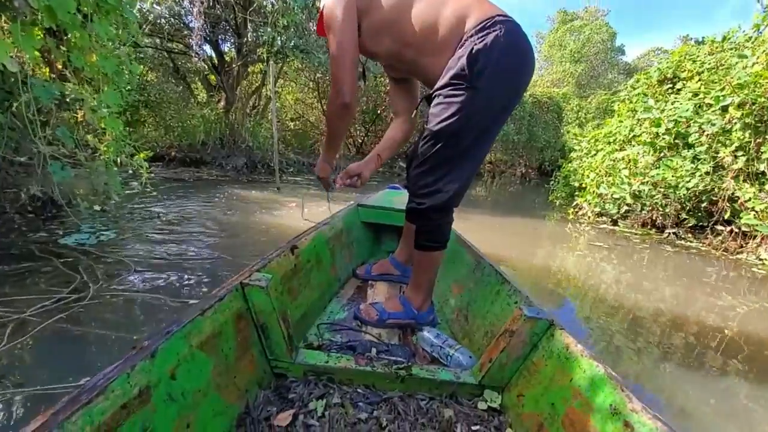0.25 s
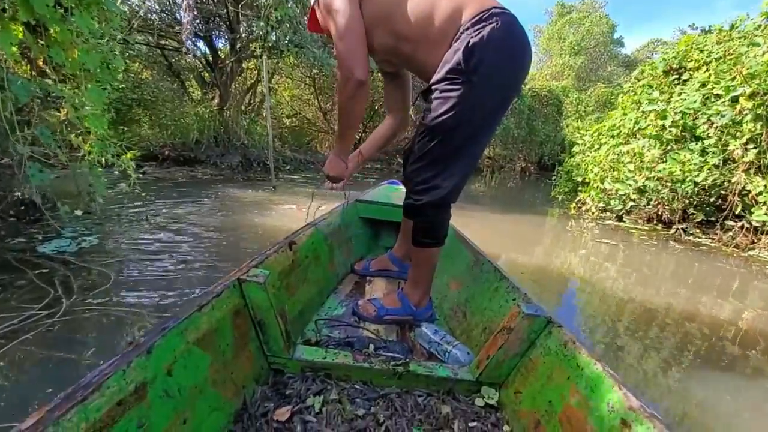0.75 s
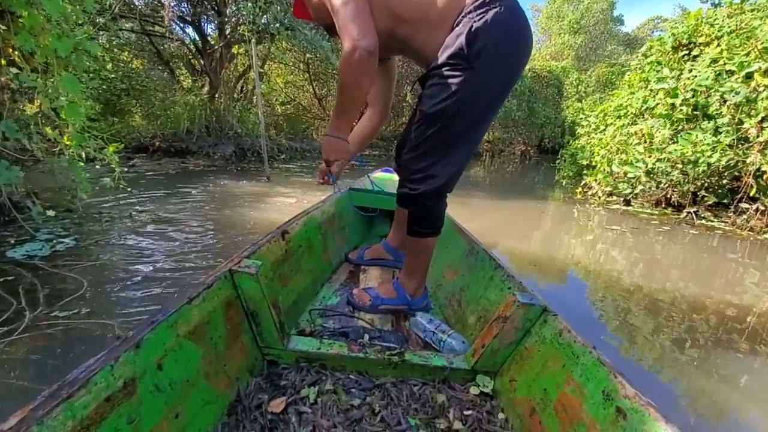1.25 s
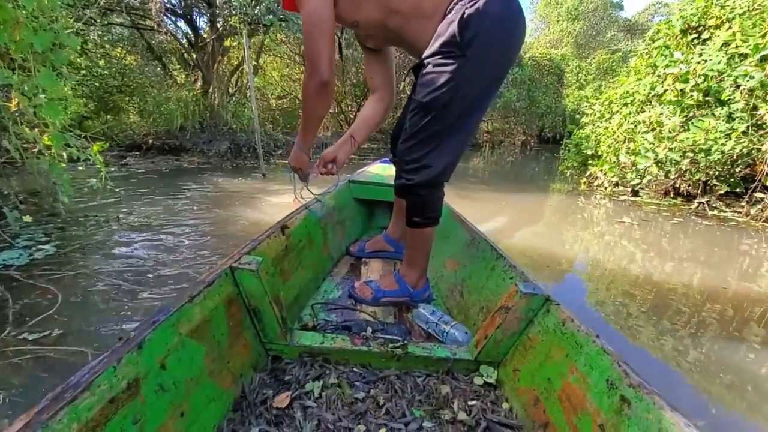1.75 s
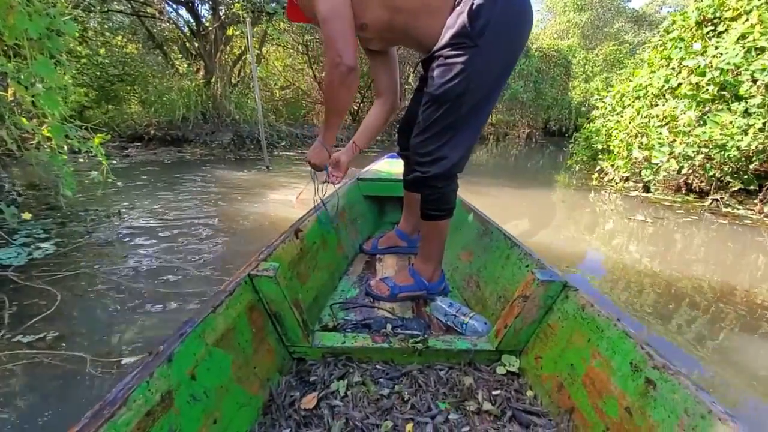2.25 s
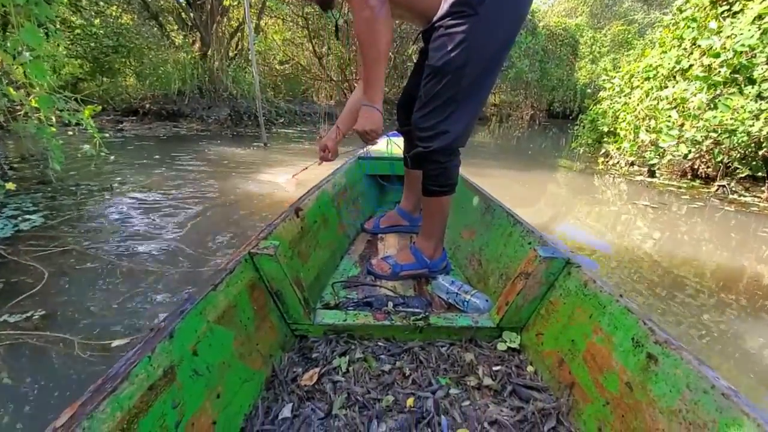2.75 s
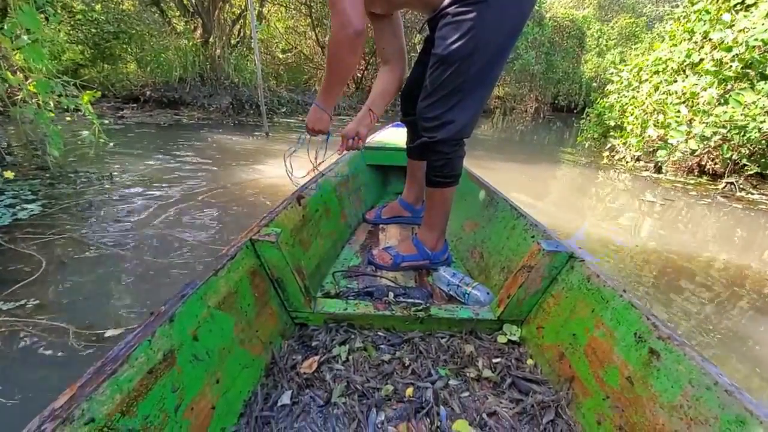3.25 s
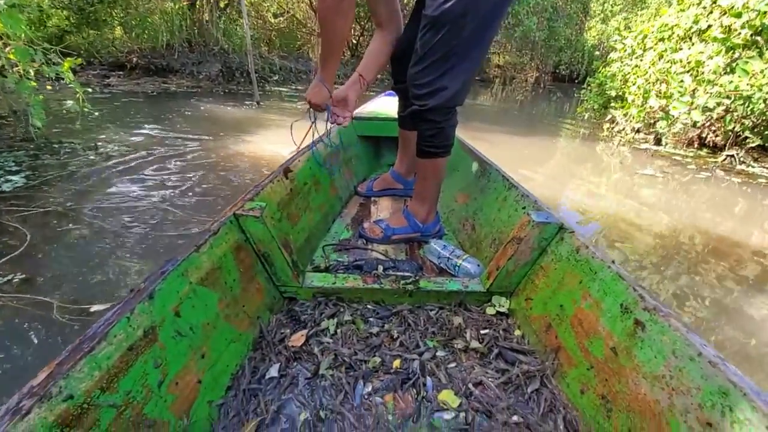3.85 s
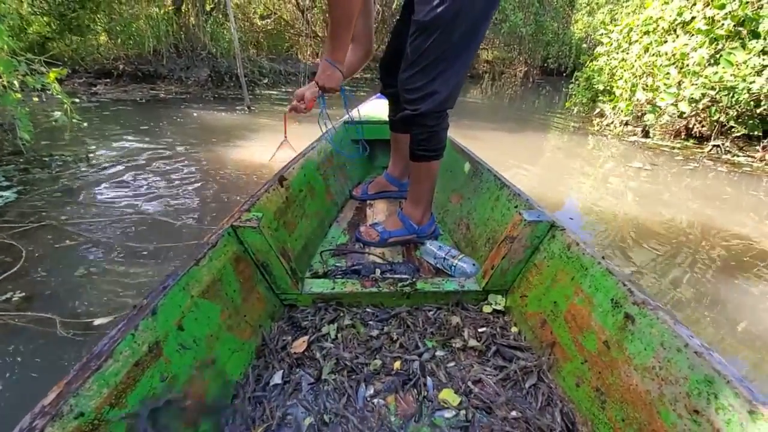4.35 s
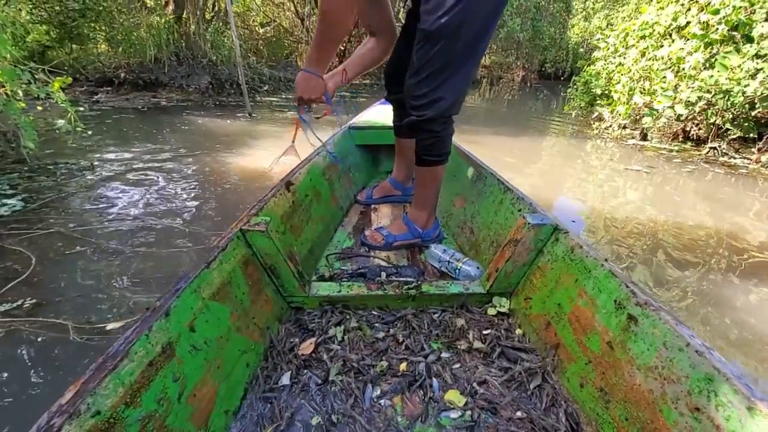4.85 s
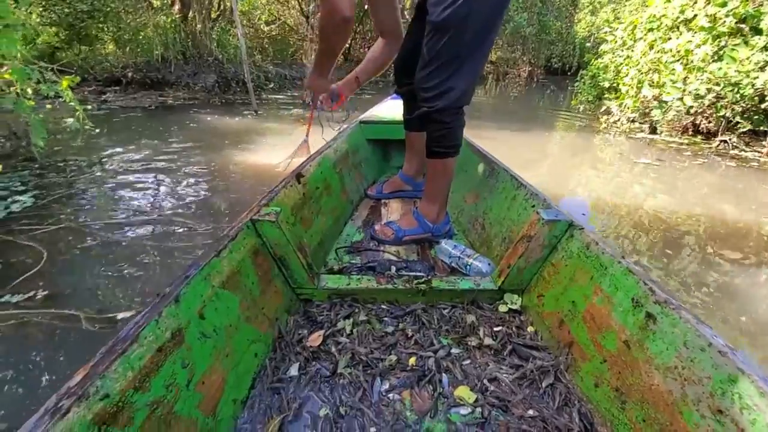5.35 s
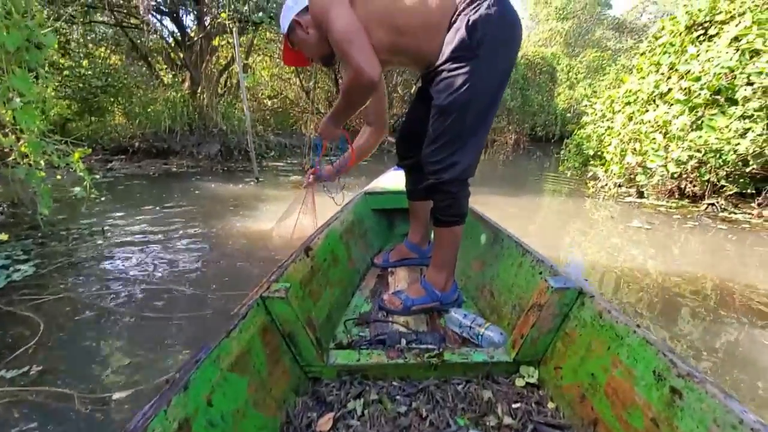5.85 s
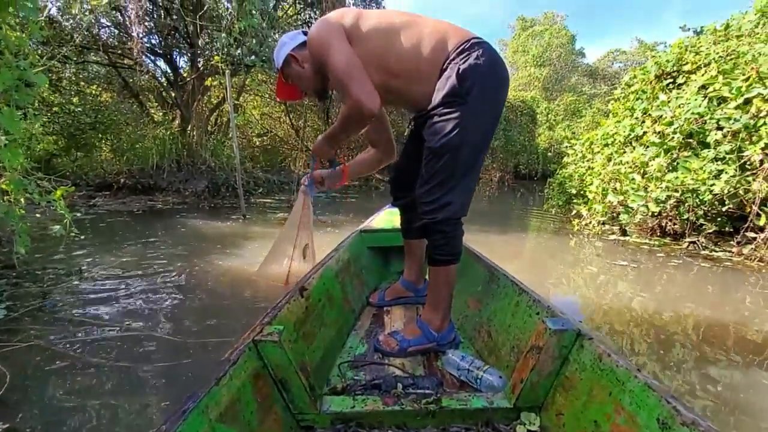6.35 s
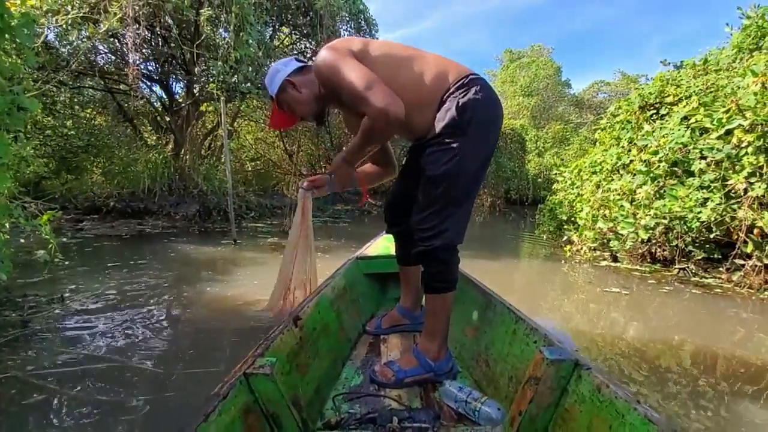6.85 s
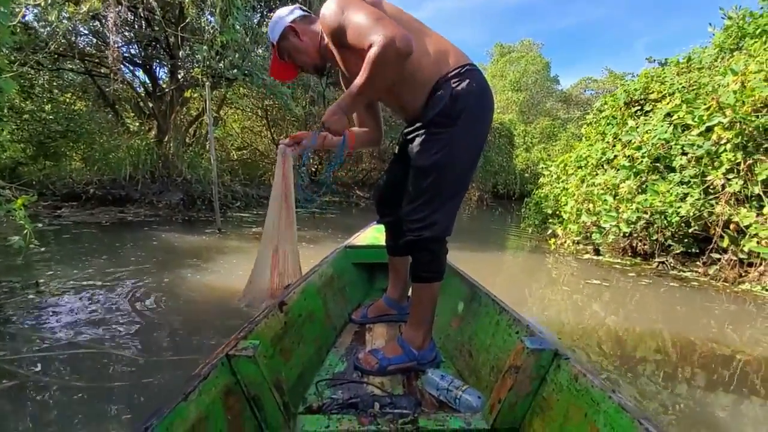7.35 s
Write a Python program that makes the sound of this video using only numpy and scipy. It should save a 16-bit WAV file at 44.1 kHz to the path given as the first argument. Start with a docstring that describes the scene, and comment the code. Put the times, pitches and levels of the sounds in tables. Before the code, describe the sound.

Close stereo outdoors on a small wooden boat: a wet line drags over the edge in four short bursts of croaking, rasping friction, the planks ringing dully. Between pulls come hull knocks, bright drips, plops and brief gushes running off a net. Soft ripples thump underneath. Behind lie faint insects, leaves, light wind and a distant low motor that swells near the end.

```python
"""Hauling a cast net into a wooden boat

A cast net is hauled hand over hand to the bow of a small wooden boat, in a quiet channel.
Four pulls drag the wet line over the gunwale: stick-slip rings the planks, snapping fibres make rasping noise.
Water runs off as grainy noise and drips as bubbles that rise in pitch; the hull rings when knocked.
Behind lie ripples under the hull, swept-sine birds, noise bands for insects, leaves and wind, and a far
motor of three partials."""
import sys
import numpy as np
from scipy import signal
from scipy.fft import rfft, irfft, next_fast_len
from scipy.io import wavfile
from scipy.ndimage import uniform_filter1d, map_coordinates

SR = 44100
rng = np.random.default_rng(int(sys.argv[2]) if len(sys.argv) > 2 else 0)


def generate_wav(sig):
    """Save sig (samples, or channels by samples) to the path in sys.argv[1] as 16-bit PCM at SR."""
    pcm = np.round(np.clip(np.atleast_2d(sig).T, -1, 1) * 32767).astype(np.int16)
    wavfile.write(sys.argv[1], SR, pcm)


N = 335139
TIME = np.arange(N) / SR  # s
LET_GO_S = 0.11  # a released tug falls 60 dB in this time, besides its sag

# each pull is two tugs, one for each hand; the line tightens, then slides:
# (time [s], tightening [s], sliding [s], croak level [dB], rasp level [dB], hiss level [dB],
#  tight pitch [Hz], sliding pitch [Hz])
LINE_TUGS = [(0.098, 0.096, 0.051, -19.5, -27.5, -39.5, 520, 540),
             (0.292, 0.083, 0.12, -17, -24.5, -36.5, 487, 541),
             (2.808, 0.018, 0.035, -29.5, -28, -48.5, 520, 560),
             (2.882, 0.1, 0.043, -33, -40.5, -52.5, 486, 508),
             (3.453, 0.11, 0.16, -20, -29.5, -35.5, 468.5, 465),
             (3.732, 0.11, 0.24, -21.5, -24, -36.5, 465, 788),
             (5.564, 0.064, 0.027, -22.5, -28.5, -41.5, 480, 510),
             (5.688, 0.062, 0.2, -17, -22.5, -42.5, 501, 633)]
# the hardest catches of the line: (time [s], level [dB], pitch [Hz])
LINE_CATCHES = [(0.071, -24.5, 495), (0.107, -19, 436), (0.29, -17.5, 614), (0.38, -8, 480),
                (0.414, -10, 615), (0.441, -10.5, 485), (2.809, -23.5, 448), (2.921, -25, 441),
                (2.966, -34, 453), (3.039, -25, 465), (3.455, -14.5, 420), (3.503, -11.5, 429),
                (3.547, -6, 432), (3.613, -10, 454), (3.812, -25, 407), (3.855, -5, 451),
                (3.904, -13.5, 517), (5.696, -8.5, 477), (5.771, -12, 380)]


def croak():
    """Stick-slip friction: the line sticks and slips on the gunwale, and each slip rings the plank."""
    start, tighten, _, croak_db, _, _, tight_hz, sliding_hz = np.transpose(LINE_TUGS)
    count, glide_s = 2000, 0.15
    scatter, detune, force = rng.standard_normal((3, count))
    s = np.clip((np.arange(count) + 0.368 * scatter) / count, 0, 1) * TIME[-1]
    # the pitch glides from tight to sliding in every tug
    tug = np.maximum(np.searchsorted(start, s) - 1, 0)
    sliding = np.clip((s - (start + tighten)[tug]) / glide_s, 0, 1)
    pitch = tight_hz[tug] + (sliding_hz - tight_hz)[tug] * sliding
    slips = rings(s, pitch * np.exp(0.1 * detune), amp(2 * force), cycles=1.4)
    # level the slips: the pull of the arms sets their mean force
    slips /= np.sqrt(np.abs(uniform_filter1d(slips ** 2, size=600)) + 1e-9)
    pull = swells(LINE_TUGS, croak_db, depth_db=10, sag_db_per_s=105, release_s=LET_GO_S)
    pull = pull * amp(1.8 * wobble(45))
    s, db, hz = np.transpose(LINE_CATCHES)
    jerks = rings(s, hz, amp(db - 2), cycles=1.7)
    # plank response: (frequency [Hz], gain [dB])
    plank = [(40, -20.5), (150, -1.0), (290, -0.5), (430, -0.5), (670, 3.0), (900, -15), (1500, -9.5)]
    return filtered(pull * slips + jerks, lambda hz: amp(along(plank, hz)))


# colour of fibres snapping over the rough edge: (frequency [Hz], gain [dB])
FIBRE_COLOUR = [(25, -33.5), (60, -8.5), (250, -28.5), (700, 1), (1000, -1), (1500, -1), (2100, -1.5),
                (3500, -2), (5000, -12), (6500, -18), (7600, -29.5), (9500, -23.5), (16000, -33.5)]


def rasp():
    """Friction noise: wet fibres snap over the edge, hardest at a catch, and squeeze out a fine hiss."""
    grip = amp(0.8 * wobble(200))
    fibres = coloured(crackle(rate=11000, spread_db=6) * grip, FIBRE_COLOUR)
    hiss_colour = [(2000, -19.5), (5000, 9.5), (7600, -2.5), (9500, -2), (12000, -7.0), (16000, -7.0)]
    hiss = coloured(crackle(rate=16000, spread_db=3) * grip, hiss_colour)
    rasp_db, hiss_db = np.transpose(LINE_TUGS)[4:6]
    scrape = swells(LINE_TUGS, rasp_db, depth_db=10, sag_db_per_s=25.5, release_s=LET_GO_S)
    squeeze = swells(LINE_TUGS, hiss_db, depth_db=7, sag_db_per_s=11.5, release_s=LET_GO_S)
    s, db, _ = np.transpose(LINE_CATCHES)
    snaps = bursts(s, db - 21, t60=0.02)
    return (scrape + snaps) * fibres + squeeze * hiss


# blows on the hull: (time [s], ring level [dB], pitch [Hz], clack level relative to the ring [dB])
HULL_KNOCKS = [(0.025, -16, 492, -17.5), (0.815, -22.5, 425, -16.5), (1.073, -56, 514, 19.5),
               (1.419, -46.5, 499, 7), (2.038, -46.5, 510, 6), (2.595, -37, 685, -6.5),
               (2.839, -23.5, 630, -2.5), (3.454, -25, 450, -0.5), (3.529, -17, 439, -6),
               (5.03, -37, 410, 3), (5.123, -28, 314, -18), (5.86, -21.5, 754, -1)]
# colour of the clack of wood on wood: (frequency [Hz], gain [dB])
CLACK_COLOUR = [(200, -24.5), (600, 5.5), (1000, 5), (2200, -5.5), (5000, -40), (16000, -40.5)]


def knocks():
    """Impact excitation: a dull blow rings a plank mode, with a noisy clack and a longer, deeper boom."""
    s, db, hz, clack_db = np.transpose(HULL_KNOCKS)
    noise = rng.standard_normal(N)
    clack = bursts(s, db + clack_db, t60=0.081) * coloured(noise, CLACK_COLOUR)
    boom_colour = [(35, -36.0), (90, -3.5), (160, 1.5), (400, 4.5), (650, 1.5), (1100, -19), (4000, -53)]
    # the same noise backwards serves as a second, unrelated noise
    boom = bursts(s, db - 11, t60=0.24) * coloured(noise[::-1], boom_colour)
    return rings(s, hz, amp(db), cycles=1) + clack + boom


# gushes as more of the net clears the water:
# (time [s], swelling [s], draining [s], wash level [dB], spray level [dB])
NET_GUSHES = [(0.02, .06, 0.066, -42.5, -58.5), (0.503, 0.0226, 0.0055, -30, -53.5),
              (0.592, 0.011, 0.074, -49.5, -59.5), (1.24, 0.098, 0.09, -47, -52.5),
              (3.061, 0.041, 0.048, -54, -68), (3.2, 0.041, 0.1, -54, -83),
              (4.122, .012, 0.076, -45, -37.5), (4.371, 0.02, 0.21, -54, -45.5),
              (4.518, 0.054, 0.0293, -49, -46), (4.907, 0.079, 0.13, -40.5, -46),
              (4.98, .15, 0.095, -34.5, -43), (5.53, 0.042, 0.031, -58, -48),
              (5.97, 0.1, 0.013, -44, -54.5), (6.151, 0.027, 0.017, -50.5, -47),
              (6.75, 0.062, .02, -54.5, -63.5), (7.19, 0.017, .06, -60, -70)]
# the thin stream that keeps running off line and net: (time [s], level [dB])
TRICKLE_LEVEL = [(0.7, -61.5), (1.1, -67), (1.55, -60), (2.1, -74), (2.3, -63.5), (2.8, -71.5),
                 (4.8, -77.5), (5.3, -59.5), (6.4, -75), (6.7, -70.5), (7.2, -60), (7.6, -64)]
# colours of rushing water and of fine spray: (frequency [Hz], gain [dB])
WASH_COLOUR = [(200, -3.5), (400, -3), (700, 6), (1100, 6.5), (1700, 4), (2400, -1), (4000, 4),
               (6500, -13.5), (16000, -46.5)]
SPRAY_COLOUR = [(200, -31.5), (700, -22.5), (2000, 10), (4000, 12.5), (7000, 8.5), (11000, 9.5), (16000, 4)]


def runoff():
    """Bubble and impact noise of flow: gushes over a trickle make a gurgling wash under a fizzing spray."""
    bubbles = fizz(count=2600, centre_hz=1950, width=0.28, spread_db=3, cycles=3, size=800)
    tiny = fizz(count=2500, centre_hz=8500, width=0.42, spread_db=6, cycles=2.5, size=250)
    wash = coloured(crackle(rate=3000, spread_db=4) * amp(2 * wobble(60)), WASH_COLOUR)
    spray = coloured(crackle(rate=1500, spread_db=11.5), SPRAY_COLOUR)
    wash_db, spray_db = np.transpose(NET_GUSHES)[3:]
    trickle = amp(curve(TRICKLE_LEVEL))
    drain_s = 0.1  # a spent gush falls 60 dB in this time, besides its sag
    flow = trickle + swells(NET_GUSHES, wash_db, depth_db=10.5, sag_db_per_s=32, release_s=drain_s)
    mist = swells(NET_GUSHES, spray_db, depth_db=6.5, sag_db_per_s=95.5, release_s=drain_s)
    mist = amp(-3.5) * trickle + mist
    return flow * unit(wash + amp(-6.5) * bubbles) + mist * (spray + amp(-9.5) * tiny)


# the clearest splashes and drops:
# (time [s], level [dB], bubble pitch at birth [Hz], spray level relative to the drop [dB])
CLEAR_DROPS = [(0.523, -14, 3600, -33), (0.66, -36, 2770, -11.5), (1.118, -40.5, 1290, -16),
               (1.325, -28.5, 1730, -31.5), (1.363, -29, 1790, -28.5), (1.417, -27.5, 2670, -21.5),
               (1.713, -33.5, 3600, -17.5), (1.78, -37.5, 1280, -9), (2.247, -32, 4940, -11),
               (2.292, -41.5, 2530, -14.5), (2.33, -26.5, 3970, -33.5), (2.348, -36, 1240, -23.5),
               (3.257, -31, 1275, -19.5), (3.283, -33.5, 903, -25), (4.126, -16.5, 2670, -20),
               (4.135, -8.5, 2860, -28), (4.14, -12, 954, -20.5), (4.372, -30, 4000, -13.5),
               (4.507, -40.5, 958, -1.5), (4.552, -25, 3750, -12.5), (4.908, -37, 1910, -14),
               (4.97, -27, 2460, -11.5), (5.054, -25.5, 748, -32.5), (5.141, -17, 1954, -18.5),
               (5.239, -23.5, 2720, -20), (5.954, -15.5, 651, -17.5), (6.056, -30.5, 620, -9.5),
               (6.8, -37, 720, -11), (6.843, -30, 900, -34), (6.96, -32, 4134, -21.5),
               (7.082, -38, 1353, -14.5), (7.135, -39.5, 2365, -8.5), (7.191, -31.5, 3600, -20.5),
               (7.211, -30.5, 4290, -23.5), (7.41, -36, 2610, -20.5), (7.453, -35, 1824, -16)]


def drops():
    """Bubble resonance: a drop slaps the surface and traps a main bubble and lesser ones, rising in pitch."""
    s, db, hz, spray_db = np.vstack([stray_drips(count=130), CLEAR_DROPS]).T
    patter = coloured(crackle(rate=12000, spread_db=4), SPRAY_COLOUR)
    slap = bursts(s, db + spray_db + 7, t60=0.016) * patter
    splash = bursts(s, db - 16, t60=0.032) * coloured(rng.standard_normal(N), WASH_COLOUR)
    main = rings(s, hz, amp(db - 3.5), cycles=2.8, rise=0.014, size=2200)
    # four lesser bubbles follow each main one
    late, detune = rng.standard_normal((2, 4, len(s)))
    cluster_s = (s + 0.012 * np.abs(late)).ravel()
    cluster_hz = (hz * np.exp(0.1 + 0.25 * detune)).ravel()
    cluster = rings(cluster_s, cluster_hz, np.tile(amp(db - 10.5), 4), cycles=3, rise=0.014)
    return slap + splash + main + cluster


def stray_drips(count):
    """A random point process: drips are larger and denser the more water trickles; rows as in CLEAR_DROPS."""
    flow_db = curve(TRICKLE_LEVEL)
    fallen = np.cumsum(np.sqrt(amp(flow_db)))
    s = np.interp((np.arange(count) + rng.random(count)) / count * fallen[-1], fallen, TIME)
    force, detune, wet = rng.standard_normal((3, count)).clip(-2, 2)
    db = np.interp(s, TIME, flow_db) + 12 + 5.5 * force
    return np.column_stack([s, db, 2065 * np.exp(0.45 * detune), -7 + 4 * wet])


# the boat rocks and the larger ripples thump under it: (time [s], level [dB])
HULL_THUMPS = [(1.191, -39), (1.619, -39), (2.238, -36), (2.66, -36.5), (2.716, -31), (4.625, -40.5),
               (5.094, -29.5), (5.263, -38)]


def ripples(count):
    """Low hull resonance: a few large ripples, and lesser ones at random, each ring it near 67 Hz."""
    lesser = np.column_stack([rng.random(count) * TIME[-1], -52 + 2 * rng.standard_normal(count)])
    s, db = np.vstack([lesser, HULL_THUMPS]).T
    return rings(s, 67 * np.exp(0.15 * rng.standard_normal(len(s))), amp(db), cycles=0.8, size=6000)


# a second bird whistles faintly, further off: (time [s], length [s], level [dB])
FAR_WHISTLES = [(0.73, .13, -57), (1.6, 0.36, -65.5), (4.622, 0.083, -66.5)]


def birds(count):
    """Frequency-modulated tones: a trill of arched chirps, each lower than the last, and arched whistles."""
    song = np.zeros(N)
    flutter = 1 + 0.035 * wobble(600)  # makes the calls slightly hoarse
    trill_s, every_s, chirp_s, chirp_db = 6.24, 0.054, 0.034, -59
    top_hz, step_hz, chirp_arch_hz = 3400, 55.4, 1009
    calls = [(trill_s + k * every_s, chirp_s, chirp_db, top_hz - k * step_hz, chirp_arch_hz)
             for k in range(count)]
    calls += [(s, length, db, 1590, 282) for s, length, db in FAR_WHISTLES]
    for s, length, db, peak_hz, arch_hz in calls:
        u = np.linspace(0, 1, int(length * SR))
        span = int(s * SR) + np.arange(len(u))
        hz = (peak_hz - arch_hz * (2 * u - 1) ** 2) * flutter[span]
        fade = np.sqrt(np.abs(np.sin(np.pi * u)))
        song[span] += amp(db) * fade * np.sin(2 * np.pi * np.cumsum(hz) / SR)
    return song


def insects():
    """Narrow-band noise: many shrill callers merge into one wavering band around 9200 Hz."""
    shrill = filtered(rng.standard_normal((2, N)), lambda hz: np.exp(-((hz - 9200) / 750) ** 2))
    return amp(-63 + 1.7 * wobble(5.7)) * unit(shrill)


# wind buffeting: (time [s], level [dB])
WIND_LEVEL = [(0, -47), (1, -53), (2.7, -52.5), (3.4, -54.5), (4.5, -60.5), (5.2, -54.5), (7.6, -59)]
# colour of the buffeting: (frequency [Hz], gain [dB])
BUFFET_COLOUR = [(15, -10.5), (35, -21), (55, -5.5), (90, -7.5), (140, -16), (250, -23.5), (600, -42.5),
                 (2000, -109)]


def wind():
    """Turbulent pressure noise: gusts buffet the two microphones, partly in common, the left one harder."""
    turbulence = rng.standard_normal(N) + 1.6 * rng.standard_normal((2, N))
    gusts = coloured(turbulence * amp(2 * wobble(9)), BUFFET_COLOUR)
    return amp(curve(WIND_LEVEL) + np.array([[2.2], [-2.2]])) * gusts


# leaf rustle in the breeze: (time [s], level [dB])
BREEZE_LEVEL = [(0, -69.5), (2.7, -63.5), (3.4, -67), (4.8, -67), (6.5, -70.5), (7.6, -67)]
# colour of the leaves: (frequency [Hz], gain [dB])
LEAF_COLOUR = [(150, -23.5), (300, -2.5), (600, 14), (950, -6.5), (1500, 5), (2200, 0), (4000, 7),
               (7000, 3.5), (16000, -28.5)]


def leaves():
    """Broadband rustle: slowly wavering noise stands for countless small contacts of leaves."""
    rustle = coloured(rng.standard_normal((2, N)) * amp(wobble(0.51)), LEAF_COLOUR)
    return amp(curve(BREEZE_LEVEL)) * rustle


def motor():
    """Periodic tone: three low partials share an unsteady speed; the far motor idles, then grows louder."""
    turns = np.cumsum(1 + 0.0262 * wobble(6.5)) / SR
    partials = [(47, 0), (91.5, 3.5), (137, -23.5)]  # (mean frequency [Hz], relative level [dB])
    hum = unit(sum(amp(db) * np.sin(2 * np.pi * hz * turns) for hz, db in partials))
    idle_db, loud_db, up_s, rise_s = -59.5, -49.5, 6.72, 0.24
    opening = np.clip((TIME - up_s) / rise_s, 0, 1)
    return amp(idle_db + (loud_db - idle_db) * opening) * hum


# colour of the still air: (frequency [Hz], gain [dB])
AIR_COLOUR = [(88, -35), (150, 0), (240, 8), (1020, -31), (1120, -2), (3490, -32), (4410, -48),
              (7620, -30.5), (9260, -20), (11000, -7), (16000, -7)]


def still_air():
    """Stationary ambient noise: a steady coloured floor, independent in each ear."""
    return amp(-64.5) * coloured(rng.standard_normal((2, N)), AIR_COLOUR)


def banks(x):
    """Diffuse reverberation: overgrown banks answer with noise whose decay time depends on frequency."""
    hz, t, z = signal.stft(rng.standard_normal((2, SR // 2)), SR, nperseg=256)
    t60 = along([(200, 0.047), (2000, 0.29), (10000, 0.13)], hz)[:, None]  # s
    tail = signal.istft(z * amp(-60 * t / t60), SR, nperseg=256)[1]
    return signal.fftconvolve(x[None], tail / np.linalg.norm(tail[0]), axes=1)[:, :N]


def placed(x, lag_ms, left_db, scatter_hz, size=1024):
    """Interaural cues: the left ear leads, treble levels differ by left_db, and scattering blurs the treble."""
    half, side = size // 2, np.array([[[1]], [[-1]]]) / 2
    pieces = np.lib.stride_tricks.sliding_window_view(np.pad(x, size), size)[::half]
    fade = np.sin(np.pi * np.arange(size) / size)
    hz = np.fft.rfftfreq(2 * size, 1 / SR)
    straight = 1 / (1 + (hz / scatter_hz) ** 2)  # share of the power that is not scattered
    lead = np.exp(2j * np.pi * hz * side * lag_ms / 1000)
    direct = rfft(pieces * fade ** 2, 2 * size) * np.sqrt(straight) * lead
    # new random paths for every piece; they shuffle the phases and leave the colour alone
    paths = rng.standard_normal((2, len(pieces), half)) * amp(-60 * TIME[:half] / 0.012)
    paths = rfft(paths, 2 * size)
    echo = rfft(pieces * fade, 2 * size) * paths / np.abs(paths) * np.sqrt(1 - straight)
    heard = irfft((direct + echo) * amp(side * left_db * hz / (hz + 1500)))
    # overlap-add the pieces
    where = half * np.arange(len(pieces))[:, None] + np.arange(2 * size)
    return np.array([np.bincount(where.ravel(), ear.ravel())[size:size + N] for ear in heard])


def rings(s, hz, gain, cycles, rise=0, size=1400):
    """Damped resonance: each ring peaks after some cycles and dies away; its pitch may rise with age."""
    turns = hz[:, None] * np.arange(size) / SR
    age = turns / cycles
    tone = np.sin(2 * np.pi * turns * (1 + rise * np.minimum(age, 10)))
    waves = gain[:, None] * age * np.exp(1 - age) * tone
    where = (np.abs(s) * SR).astype(int)[:, None] + np.arange(size)
    return np.bincount(where.ravel(), waves.ravel(), N)[:N]


def fizz(count, centre_hz, width, spread_db, cycles, size):
    """Superposed resonances: a steady swarm of bubbles of scattered sizes, at rms 1."""
    moment = rng.random(count)
    detune, force = rng.standard_normal((2, count)).clip(-2, 2)
    hz = np.clip(centre_hz * np.exp(width * detune), 300, 15000)
    return unit(rings(moment * TIME[-1], hz, amp(spread_db * force), cycles, rise=0.0078, size=size))


def crackle(rate, spread_db):
    """Shot noise: tiny impulses, rate per second on average, at random moments and of unequal sizes."""
    sizes = amp(spread_db * rng.standard_normal(N).clip(-2, 2))
    return (rng.random(N) < rate / SR) * rng.choice([-1, 1], N) * sizes


def bursts(s, db, t60):
    """Exponential decay: an envelope that jumps at each moment and falls 60 dB in t60 seconds."""
    kicks = np.bincount((np.abs(s) * SR).astype(int), amp(db), N)[:N]
    return signal.lfilter([1], [1, -np.exp(-np.log(1000) / (t60 * SR))], kicks)


def swells(rows, db, depth_db, sag_db_per_s, release_s):
    """Envelope of events (s, rise s, hold s): each climbs depth_db, sags and is released; the loudest rules."""
    start, rise, hold = np.transpose(rows)[:3, :, None]
    coarse = TIME[::32]
    past = coarse - start - rise
    shape_db = depth_db * np.minimum(past / rise, 0)
    shape_db = shape_db - sag_db_per_s * np.maximum(past, 0)
    shape_db = shape_db - 60 * np.maximum(past - hold, 0) / release_s
    onset = np.clip((coarse - start) / 0.0041, 0, 1)  # a fade-in of 4.1 ms
    gain = amp(db[:, None] + shape_db) * onset
    return np.interp(TIME, coarse, gain.max(axis=0))


def wobble(rate):
    """Random modulation: a smooth random curve with rate knots a second."""
    coarse = TIME[::32]
    knots = rng.standard_normal(8192)
    return np.interp(TIME, coarse, map_coordinates(knots, [coarse * rate], mode="wrap"))


def curve(rows, order=1):
    """Linear interpolation: one column of a table, per sample."""
    rows = np.asarray(rows)
    return np.interp(TIME, rows[:, 0], rows[:, order])


def along(points, hz):
    """Logarithmic interpolation: read (Hz, value) points on a log frequency axis."""
    f, v = np.transpose(points)
    return np.interp(np.log(hz + 1), np.log(f), v)


def filtered(x, response):
    """Linear filtering: multiply the spectrum of x by a response of frequency."""
    m = next_fast_len(N + SR // 2)
    return irfft(rfft(x, m) * response(np.fft.rfftfreq(m, 1 / SR)), m)[..., :N]


def coloured(x, spectrum):
    """Spectral shaping: x filtered by (Hz, dB) points, at rms 1."""
    return unit(filtered(x, lambda hz: amp(along(spectrum, hz))))


def unit(x):
    """Normalisation: scale to rms 1."""
    return x / np.sqrt(np.mean(x ** 2) + 1e-20)


def amp(db):
    """Logarithmic level: decibels to gain."""
    return 10 ** (np.asarray(db) / 20)


def scene():
    """Superposition: line, hull and water are placed in stereo, between the banks and the background."""
    wood, line, water, song = croak() + knocks(), rasp(), runoff() + drops(), birds(count=5)
    near = placed(wood, lag_ms=0.3, left_db=-4, scatter_hz=2500)
    near += placed(line, lag_ms=0.33, left_db=6, scatter_hz=2000)
    near += placed(water, lag_ms=0.4, left_db=8, scatter_hz=3500)
    near += amp([[2.5], [-2.5]]) * ripples(count=14)
    answer = banks(amp(-30) * wood + amp(-21) * (line + water) + amp(1) * song)
    background = insects() + wind() + leaves() + motor() + still_air()
    return near + song + answer + background


def record(dry):
    """Band limiting: nothing at or above 16100 Hz passes."""
    return filtered(dry, lambda hz: hz < 16100)


dry = scene()
out = record(dry)
generate_wav(out)
```